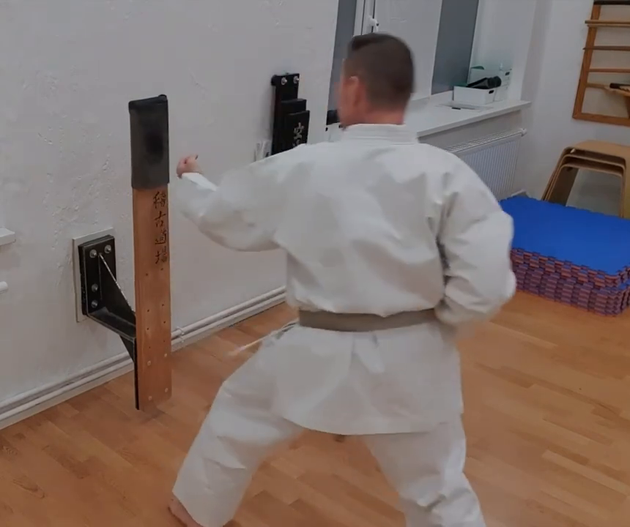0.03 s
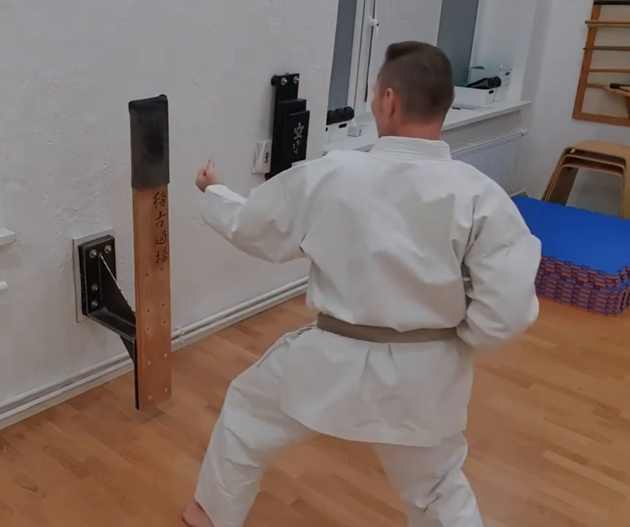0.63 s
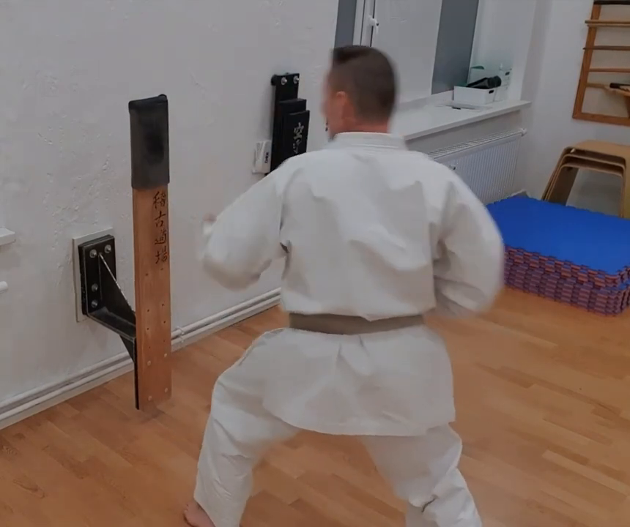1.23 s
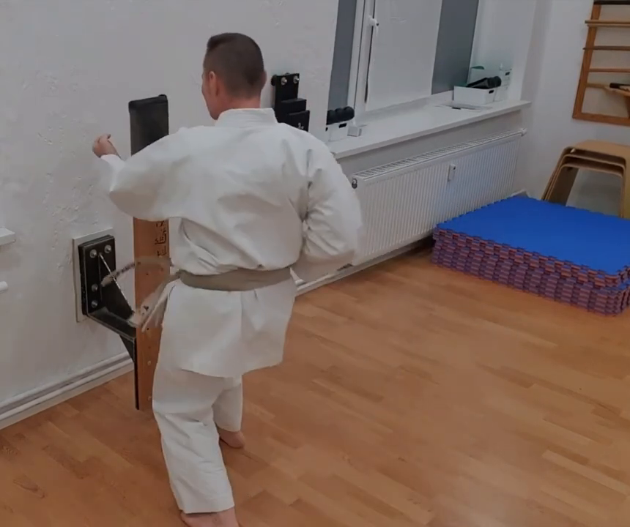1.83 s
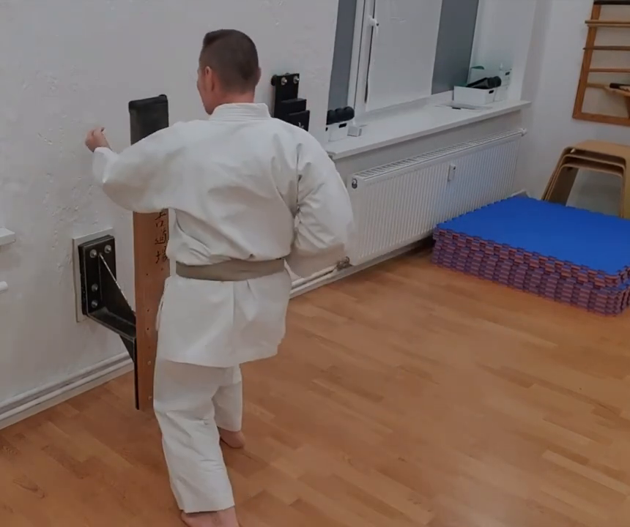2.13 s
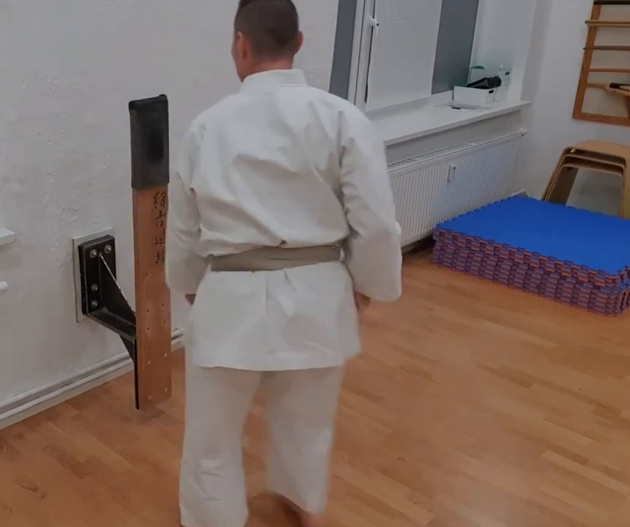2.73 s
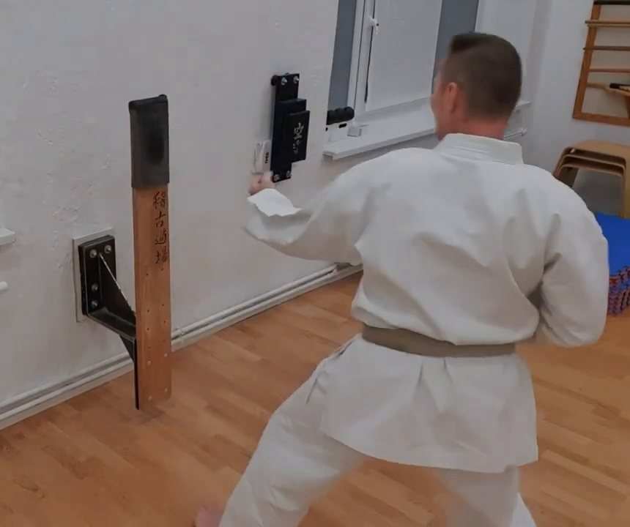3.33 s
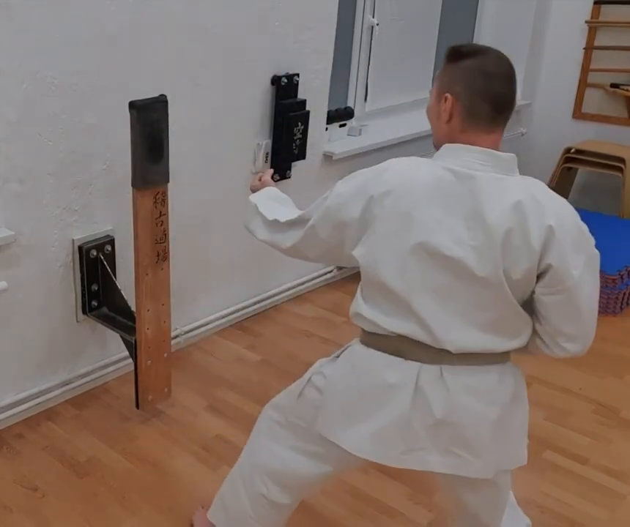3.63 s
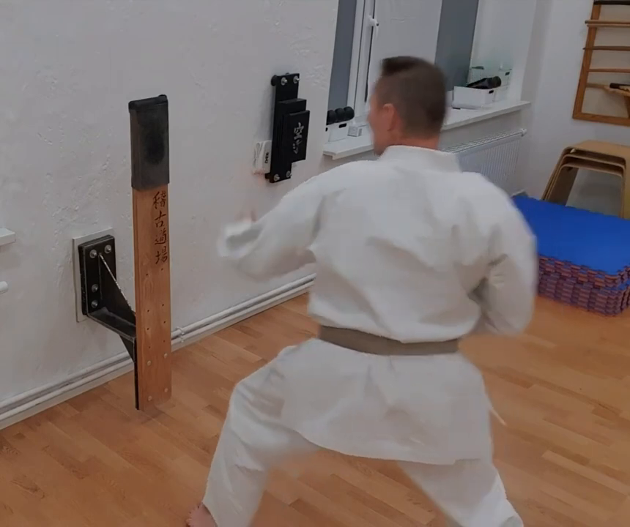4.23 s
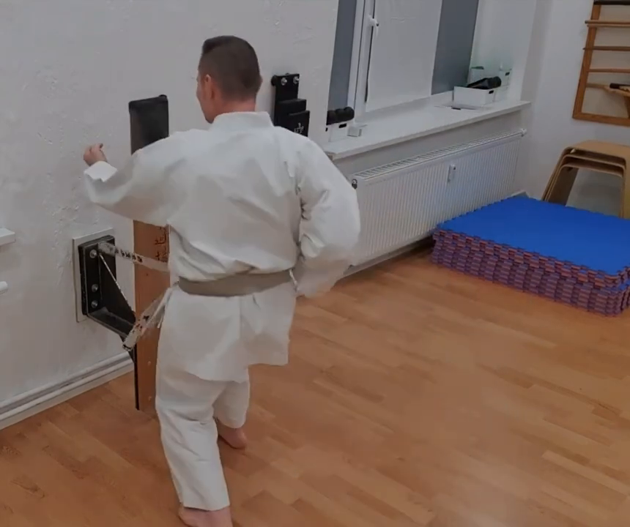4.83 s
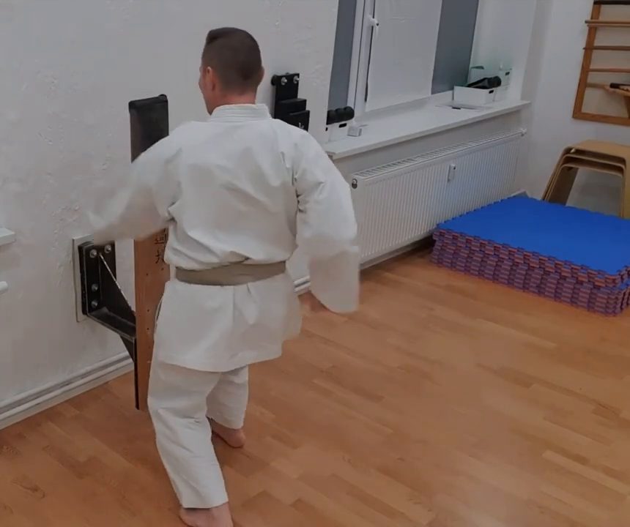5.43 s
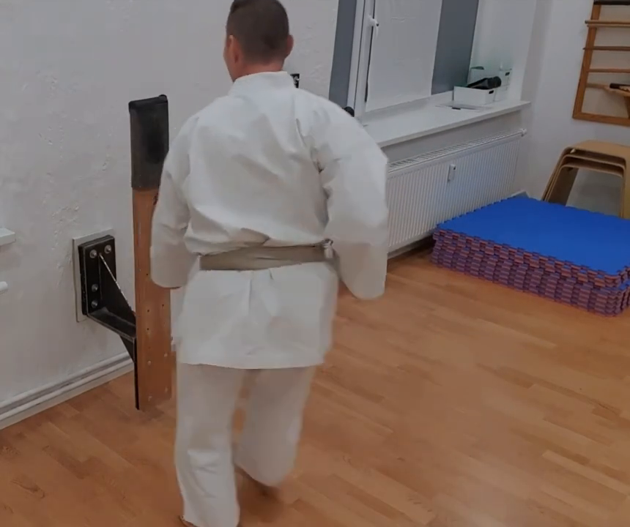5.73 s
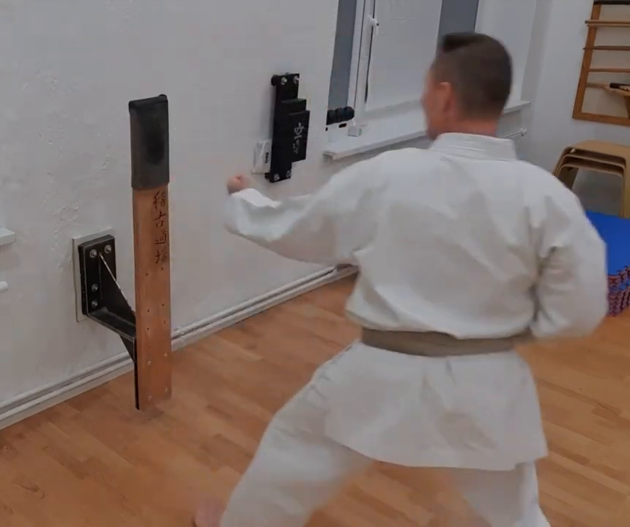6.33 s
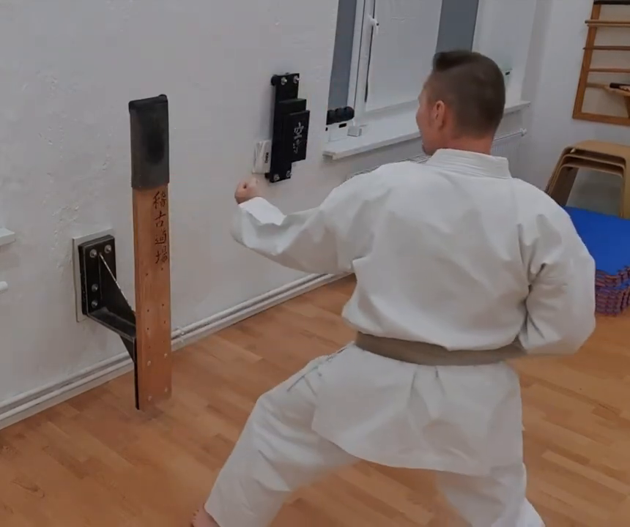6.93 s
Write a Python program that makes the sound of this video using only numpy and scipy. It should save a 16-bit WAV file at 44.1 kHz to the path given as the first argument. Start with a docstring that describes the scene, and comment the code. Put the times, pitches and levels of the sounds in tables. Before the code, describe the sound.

Two hard punches hit a padded wooden post about three seconds apart, close in front of the microphone. Each begins with a swish and snap of cotton, then a slap and a woody knock that ring around the bare room for over a second. Between and after the blows, bare feet pat and skid on the wooden floor and clothing rustles over a very faint hum.

```python
"""Punches on a padded wooden post

Two heavy punches land in a bare, wooden-floored training room still ringing from an earlier blow.
Each is a swish of the cotton jacket, a slap on the pad and, 15 ms later, the plank's knock in its
wall bracket. The room rings for over a second; between punches bare feet step and slide into stance."""
import sys
import numpy as np
from scipy import signal
from scipy.fft import rfft, irfft, next_fast_len
from scipy.io import wavfile
from scipy.ndimage import map_coordinates

SR = 44100
rng = np.random.default_rng(int(sys.argv[2]) if len(sys.argv) > 2 else 0)


def generate_wav(sig):
    """Save sig (samples, or channels by samples) to the path in sys.argv[1] as 16-bit PCM at SR."""
    pcm = np.round(np.clip(np.atleast_2d(sig).T, -1, 1) * 32767).astype(np.int16)
    wavfile.write(sys.argv[1], SR, pcm)


N = 307377


def amp(db):
    """Decibels to gain."""
    return 10 ** (np.asarray(db) / 20)


def unit(x):
    """Normalise to rms 1."""
    return x / np.sqrt(np.mean(x ** 2) + 1e-20)


def along(points, hz):
    """Read a breakpoint curve on a log frequency axis."""
    freqs, values = np.transpose(points)
    return np.interp(np.log(hz + 1), np.log(freqs + 1), values)


def seconds(size):
    """A time axis of size samples."""
    return np.arange(size) / SR


def add(track, s, sound):
    """Mix a sound into the track from time s on."""
    start = round(s * SR)
    sound = sound[..., max(-start, 0):N - start]
    track[..., max(start, 0):max(start, 0) + sound.shape[-1]] += sound


def filtered(x, response):
    """Zero-phase EQ; response gives the gain at each frequency."""
    size = next_fast_len(x.shape[-1] + SR // 8)
    gain = response(np.fft.rfftfreq(size, 1 / SR))
    return irfft(rfft(x, size) * gain, size)[..., :x.shape[-1]]


def noise(spectrum, correlation, size, tilt_db=0):
    """Coloured stereo noise of rms 1, its treble tilted by tilt_db per octave."""
    def mid_side_eq(hz):
        width = np.arccos(np.clip(along(correlation, hz), -1, 1)) / 2
        colour = amp(along(spectrum, hz) + tilt_db * np.log2(1 + hz / 200))
        return colour * [np.cos(width), np.sin(width)]
    mid, side = filtered(rng.standard_normal((2, size)), mid_side_eq)
    return unit(np.array([mid + side, mid - side]))


def wobble(rate):
    """A smooth random LFO, rate knots a second."""
    knots = rng.standard_normal(int(N * rate / SR) + 4)
    return map_coordinates(knots, [np.arange(N) * rate / SR])


def fade(t, t60):
    """Exponential decay, 60 dB down at t60."""
    return amp(-60 * t / t60)


def held(start, length, attack, release):
    """A linear attack-hold-release envelope, times in seconds."""
    t = seconds(N) - start
    return np.clip(t / attack, 0, 1) * np.clip(1 - (t - length) / release, 0, 1)


def ring(modes, t, tilt_db=0, scatter_db=0):
    """Struck modes; neighbours start in opposite polarity."""
    out = 0
    for k, (hz, db, t60) in enumerate(modes):
        gain = amp(db + tilt_db * np.log2(hz / 900) + scatter_db * rng.standard_normal())
        out += (-1) ** k * gain * fade(t, t60) * np.sin(2 * np.pi * hz * t)
    return out


# Stereo image of close sounds and first reflections: f/Hz, left-right correlation
NEAR_IMAGE = [(130, 1), (290, 0.99), (640, 0.94), (1400, 0.14), (3100, 0.33), (7000, 0)]
def burst(spectrum, t, t60, rise, tilt_db=0):
    """A close puff of noise that swells for an instant and dies away."""
    attack = 1 - np.exp(-(t / rise) ** 2)
    return noise(spectrum, NEAR_IMAGE, len(t), tilt_db) * fade(t, t60) * attack


# Stereo image of diffuse sound: f/Hz, left-right correlation
FAR_IMAGE = [(60, 1), (130, 0.96), (290, .84), (640, 0.305), (1400, 0)]
# Reverb time of the room: f/Hz, t60/s
REVERB_TIME = [(60, 1.5), (160, 1.1), (420, 1.19), (1400, 1.535), (2900, 1.296), (5000, 1.1), (8000, 0.81),
               (13000, .15)]
def diffuse(spectrum, t, build, tilt_db=0):
    """The room's reverb tail; the treble dies first."""
    wash = noise(spectrum, FAR_IMAGE, len(t), tilt_db)
    hz, frame_s, bands = signal.stft(wash, SR, nperseg=256)
    _, tail = signal.istft(bands * fade(frame_s, along(REVERB_TIME, hz)[:, None]), SR)
    return tail[:, :len(t)] * (1 - np.exp(-t / build))


# Colour of what the walls send back: f/Hz, level/dB
REVERB_EQ = [(50, -2), (130, 1.5), (250, 0), (450, 2), (800, -1), (1400, 0), (2400, -4.5), (4000, -4),
             (7000, -3.5), (10000, -11), (14000, -20)]
def room(x, near_db, far_db):
    """A dry sound plus its first reflections and tail."""
    t = seconds(2 * SR)
    near = burst(REVERB_EQ, t, t60=0.33, rise=0.0011)
    far = diffuse(REVERB_EQ, t, build=0.004)
    impulse = amp(near_db) * near / np.linalg.norm(near[0]) + amp(far_db) * far / np.linalg.norm(far[0])
    impulse[:, 0] += 1  # direct path
    return signal.fftconvolve(x, impulse, axes=1)[:, :N]


# Colour of the still air: f/Hz, level/dB
AIR_EQ = [(20, -3.5), (45, -0.5), (100, 0), (150, -10.5), (200, -2), (300, 0), (450, -3), (640, -6),
          (1050, -11.5), (1500, -7.5), (2200, -20), (3300, -19.5), (7500, -32.5), (14000, -41)]
# Tones of the building's hum: f/Hz, level/dB
HUM_TONES = [(96.9, -87), (193.8, -82), (635, -86.5), (1534, -94.5)]
def room_tone():
    """A bed of the building's faint rush and wavering hum."""
    t, hum = seconds(N), 0
    for hz, db in HUM_TONES:
        peak = amp(db + 1.2 * wobble(6.5)) * np.sqrt(2)
        hum += peak * np.sin(2 * np.pi * hz * t + 0.28 * wobble(3.5))
    return hum + amp(-69 + 0.23 * wobble(3)) * noise(AIR_EQ, FAR_IMAGE, N)


# Lunges, each ending as the fist lands: end t/s, length/s, swish level/dB, rub level/dB, drum level/dB
LUNGE_CUES = [(1.54, .33, -52, -56.5, -41), (4.628, 0.34, -47.5, -51, -50.5)]
def lunge_swell(layer, db_per_s):
    """One layer's envelope: it grows as the body gathers speed and cuts off as the post stops it."""
    swell = 0
    for end, length, *levels in LUNGE_CUES:
        landing_db = levels[("swish", "rub", "drum").index(layer)]
        to_go = np.clip(end - seconds(N), 0, None)
        gate = held(end - length, length, attack=0.17, release=0.011)
        swell += gate * amp(landing_db - db_per_s * to_go)
    return swell


def floor_drum(hz=73.4):
    """The floor drums on one wavering low note as the legs drive forward."""
    return lunge_swell("drum", db_per_s=116) * np.sin(2 * np.pi * hz * seconds(N) + 0.66 * wobble(22))


# Drops into the rear stance: t/s, thud level/dB, pat level/dB
STANCE_CUES = [(0.207, -62, -72), (3.243, -48.5, -71), (6.324, -45.5, -62)]
def rebounds(count=4, gap_s=0.08, loss_db=2.5, first_hz=66, sag_hz=5.6):
    """Footfall cues for the floor rebounding under the weight, each softer and lower than the last."""
    return [(s + k * gap_s, thud_db - k * loss_db, first_hz - k * sag_hz, pat_db - k * loss_db)
            for s, thud_db, pat_db in STANCE_CUES for k in range(count)]


# Footfalls: t/s, relative thud level/dB, thud f/Hz, pat level/dB
STEP_CUES = [(0.206, -71, 63, -71), (1.489, -50, 80, -49), (2.595, -65, 70.7, -57), (2.665, -61, 75.7, -72),
             (2.879, -71, 70.1, -61.5), (3.07, -67, 83.6, -64), (3.208, -60.5, 89.9, -55.5),
             (4.49, -56, 82.4, -54), (5.644, -65, 69.5, -61), (5.905, -58, 130.3, -55.5),
             (6.168, -56, 90.5, -54.5), (6.21, -49, 125.2, -61), (6.685, -60, 62.9, -70)]
# Modes of the sprung floor: multiple of the thud's pitch, level/dB, t60/s
FLOOR_MODES = [(0.622, -11, 0.25), (1.002, 0, 0.26), (1.55, -13, .16)]
# Colour of a bare sole's pat: f/Hz, level/dB
SOLE_EQ = [(40, -31), (140, 0.5), (230, -7), (450, -1), (650, -4), (1100, -16), (3000, -27.5),
           (12000, -60.5)]
def feet():
    """Bare soles pat the boards, and the floor thuds as it gives under the weight."""
    pats, thuds, t = np.zeros((2, N)), np.zeros(N), seconds(SR // 2)
    soft_attack = 1 - np.exp(-(t / 0.0073) ** 2)
    for s, thud_db, thud_hz, pat_db in STEP_CUES + rebounds():
        boards = [(multiple * thud_hz, db, t60) for multiple, db, t60 in FLOOR_MODES]
        add(thuds, s, amp(thud_db + 4) * ring(boards, t, scatter_db=1) * soft_attack)
        add(pats, s, amp(pat_db) * burst(SOLE_EQ, t, t60=0.34, rise=0.018))
    return thuds + room(pats, near_db=-11.5, far_db=-1)


# Cloth moves (straightening up, stepping back, flicking a sleeve): t/s, length/s, level/dB
CLOTH_CUES = [(-.05, 0.39, -69), (0.204, 0.039, -65.5), (1.215, .035, -70), (2.39, .38, -71),
              (2.766, 0.28, -76), (3.05, .12, -67), (3.196, 0.27, -70), (3.48, 0.26, -82.5),
              (3.86, .025, -70.5), (5.379, 0.31, -76), (5.695, 0.88, -73), (6.461, 0.028, -62),
              (6.552, 0.33, -81.5)]
# Colour of cloth rubbing: f/Hz, level/dB
CLOTH_EQ = [(300, -19.5), (900, 1.5), (2200, 2.5), (3500, 1.5), (5500, -4), (7500, -11), (10000, -17.5),
            (14000, -22.5)]
# Soles skidding on the varnish: t/s, level/dB, t60/s
SKID_CUES = [(0.21, -61, 0.16), (2.98, -60, .45), (3.089, -64, 0.45), (6.472, -63.5, 0.22)]
# Colour of a skid: f/Hz, level/dB
SKID_EQ = [(1000, -26), (3000, -10), (5500, -1), (8000, -11), (12000, -13), (15000, -30)]
def rustle():
    """Cloth folds and skidding soles rub in tiny uneven catches."""
    moves = sum(amp(db) * held(s, length, attack=0.043, release=0.046) for s, length, db in CLOTH_CUES)
    rubbing = (moves + lunge_swell("rub", db_per_s=51.5)) * noise(CLOTH_EQ, NEAR_IMAGE, N)
    for s, db, t60 in SKID_CUES:
        add(rubbing, s, amp(db) * burst(SKID_EQ, seconds(SR // 2), t60, rise=0.0092))
    catches = unit(amp(3 * wobble(350) + wobble(40)))
    return room(rubbing * catches, near_db=-5, far_db=-6)


# Colour of the jacket's swish: f/Hz, level/dB
SWISH_EQ = [(80, -30.5), (160, -16.5), (380, -0.5), (600, -2.5), (1000, -6), (1600, -12), (2500, -21.5),
            (4500, -43), (9000, -69)]
# The jacket snapping taut: t/s, level/dB, peak f/Hz, t60/s
SNAP_CUES = [(1.3138, -38.5, 947, 0.044), (1.492, -42.5, 330, 0.15), (1.526, -30, 993, 0.24),
             (1.534, -24.5, 1092, 0.041), (1.541, -18, 1026, 0.11), (4.361, -52, 760, 0.087),
             (4.385, -39, 720, .045), (4.451, -40.5, 427.5, 0.043), (4.614, -25, 914, 0.062),
             (4.619, -18.5, 800, 0.27)]
def jacket():
    """Heavy cotton swishes through the lunge and snaps taut as the arm shoots out."""
    cloth = lunge_swell("swish", db_per_s=38) * noise(SWISH_EQ, NEAR_IMAGE, N)
    cloth *= unit(amp(3.5 * wobble(70)))  # fast flutter in level
    for s, db, hz, t60 in SNAP_CUES:
        snap_eq = [(hz / 8, -20), (hz / 2, -6), (hz, 0), (hz * 1.7, -4), (hz * 2.8, -19), (hz * 12, -52)]
        add(cloth, s, amp(db) * burst(snap_eq, seconds(SR // 4), t60, rise=0.0008))
    return room(cloth, near_db=-6, far_db=-5.5)


# Standing waves of the room: f/Hz, level/dB, t60/s
ROOM_MODES = [(148, -9, 1.3), (339.2, -5.5, 1.4), (328, -8, .85), (475, -4.5, 1.3), (575, 2, 1.2),
              (631, -3, 1.3), (638, -1, 0.65), (679, 5.5, 0.66), (756, -2, 0.97), (888, 1, 1.15),
              (884, -0.5, 1.5), (1030, 1.5, 0.4), (1175, 0, 0.4), (1175, -3, 0.51), (1214, -4.5, 1.5),
              (1320, 0.5, 1.8), (1430, 0, 1.15), (1710, -7, 0.94), (1746, -6.5, 1.1), (1778, -7.5, 1.9)]
def standing_waves(t, tilt_db, detune_hz=3, build=0.059):
    """The room's lingering resonances; the higher ones spread wider in stereo."""
    waves = 0
    for hz, db, t60 in ROOM_MODES:
        phase = 2 * np.pi * (hz + rng.normal(0, detune_hz)) * t + rng.uniform(0, 2 * np.pi)
        spread = rng.normal(0, hz / 900, (2, 1))
        waves += amp(db + tilt_db * np.log2(hz / 900)) * fade(t, t60) * np.sin(phase + spread)
    return waves * (1 - np.exp(-t / build))


# Colour of a blow's first reflections: f/Hz, level/dB
BANG_EQ = [(71, -34.5), (120, -3.5), (254, -22), (321, 2.5), (396, -12.5), (629, 0), (824, -13.5),
           (907, -2), (1120, -10), (1360, -2.5), (2520, -22.5), (5450, -34), (9520, -51), (12000, -60.5),
           (15600, -87), (22000, -120)]
# Colour of a blow once it has filled the room: f/Hz, level/dB
WASH_EQ = [(35, -30), (75, 2.5), (190, -6), (330, 5), (440, -6.5), (640, 1), (1000, -3.5), (1400, -2),
           (1850, -8.5), (2400, -16.5), (3500, -18.5), (5500, -28.5), (8000, -38), (12000, -59)]
def room_bloom(t, tilt_db):
    """A blow bangs back off wall and floor, then blooms into a ringing tail."""
    bang = amp(-0.26) * burst(BANG_EQ, t, t60=0.23, rise=0.003, tilt_db=tilt_db)
    wash = amp(-9.5) * diffuse(WASH_EQ, t, build=0.018, tilt_db=tilt_db)
    ringing = amp(-23.5) * standing_waves(t, tilt_db)
    flutter = amp(0.8 * wobble(24)[:len(t)])  # echoes arrive in uneven clusters
    return bang + flutter * (wash + ringing)


# Clacks in the bracket: t/s, level/dB
CLACK_CUES = [(1.5501, -12), (1.5617, -7.5), (1.566, -13.5), (1.572, -18.5), (4.6298, -17), (4.6314, -21),
              (4.6462, -13.5)]
# Colour of a clack: f/Hz, level/dB
CLACK_EQ = [(300, -10.5), (1100, -1), (2000, -3.5), (3500, -5.5), (6000, -11.5), (8000, -31), (14000, -46)]
def bracket_chatter():
    """The struck plank chatters in its wall bracket."""
    out, t = np.zeros((2, N)), seconds(2 * SR)
    for s, db in CLACK_CUES:
        add(out, s, amp(db) * burst(CLACK_EQ, t, t60=0.01, rise=0.0004))
    return out


# Modes of wall and floor, shaken through the bracket: f/Hz, level/dB, t60/s
WALL_MODES = [(85, -5, 0.15), (83.3, -22, 2.1), (93.8, 1.5, 0.6), (122, -16, 0.22), (150, -5, 0.49)]
# Modes of the plank and its pad: f/Hz, level/dB, t60/s
PLANK_MODES = [(323, -9, 0.19), (510, -16.5, 0.0079), (631, -7.5, 0.15), (733, -10.5, 0.081),
               (950, -1.5, 0.062), (1156, 2, .032), (1365, -4, 0.023), (1750, -9, 0.017), (2000, -8, 0.029),
               (2820, -13, 0.027), (3560, -17.5, 0.017)]
# Colour of knuckles on the pad: f/Hz, level/dB
KNUCKLE_EQ = [(150, -24), (400, -8), (1200, 3), (2600, -5.5), (5000, -10), (8000, -17), (12500, -20),
              (15000, -32)]
# Blows on the post, one before the scene opens, then two slap-and-knock pairs: t/s, level/dB,
# tilt/(dB/octave), crack level/dB, crack tilt/(dB/octave), boom level/dB, room level/dB
BLOW_CUES = [(-0.6, -10, -0.5, -8, 0, -19, 2), (1.5478, -9.5, 1.4, -1.5, 2, -26, -1),
             (1.5623, -11.5, 0.77, -2.5, -5.5, -10, 0.5), (4.6266, -10.5, 4.5, 1.5, -2, -25.5, -5),
             (4.6418, -9.5, -2.14, -1.5, -6, -14, -1.5)]
def punches():
    """Each blow cracks on the pad, rings the plank, shakes the wall and fills the room."""
    out, t = np.zeros((2, N)), seconds(2 * SR)
    for s, db, tilt_db, crack_db, crack_tilt_db, boom_db, room_db in BLOW_CUES:
        plank = ring(PLANK_MODES, t, tilt_db, scatter_db=1)
        crack = amp(crack_db) * burst(KNUCKLE_EQ, t, t60=0.008, rise=0.0002, tilt_db=crack_tilt_db)
        boom = amp(boom_db) * ring(WALL_MODES, t) * (1 - np.exp(-t / 0.002))
        bloom = amp(room_db) * room_bloom(t, tilt_db)
        add(out, s, amp(db) * (plank + crack + boom + bloom))
    return out


def scene():
    """The post up front and a touch left, over cloth, footwork and room tone."""
    post = (punches() + bracket_chatter()) * amp([[0.4], [-0.4]])
    return post + jacket() + rustle() + feet() + floor_drum() + room_tone()


def record(dry):
    """The microphone soft-clips the highest peaks and keeps nothing above its band limit."""
    top_hz = 14900
    rounded = dry / (1 + np.abs(dry) ** 8) ** (1 / 8)
    return filtered(rounded, lambda hz: 1 / (1 + (hz / top_hz) ** 80))


dry = scene()
out = record(dry)
generate_wav(out)
```